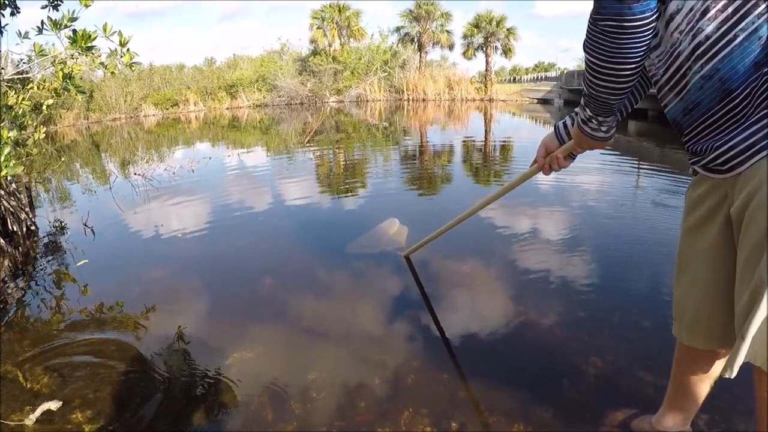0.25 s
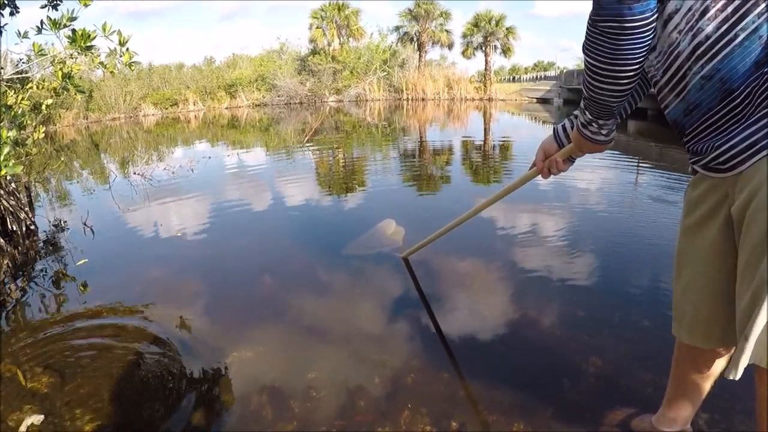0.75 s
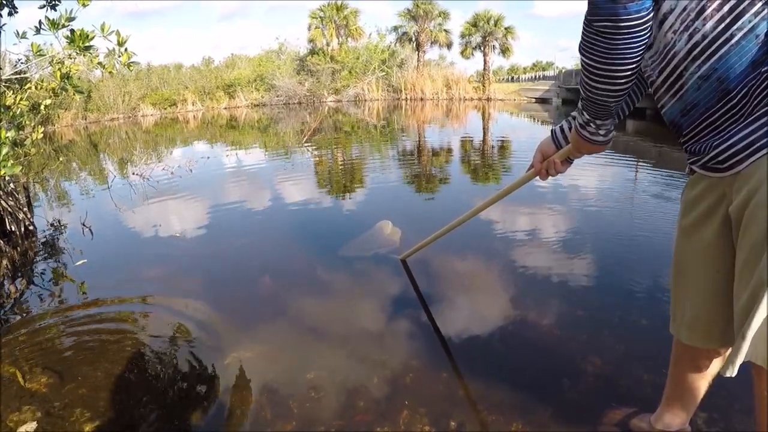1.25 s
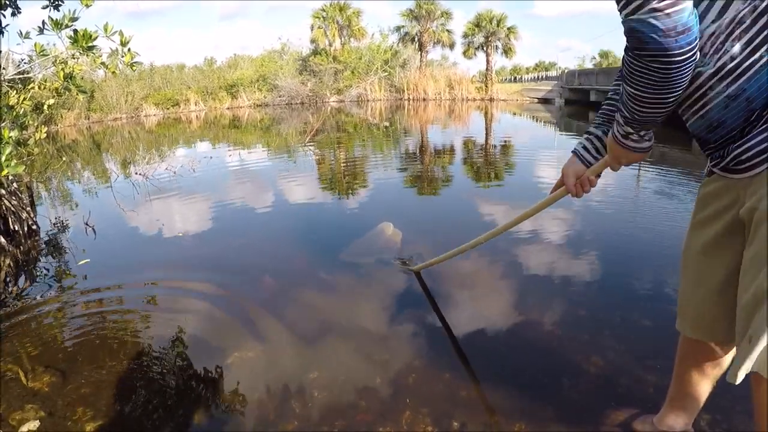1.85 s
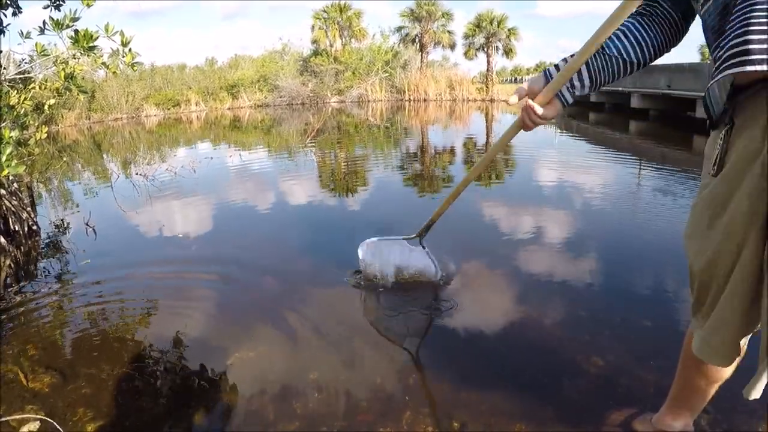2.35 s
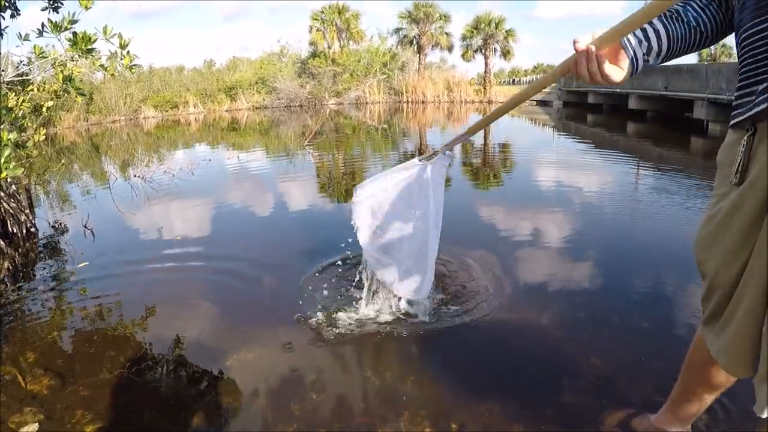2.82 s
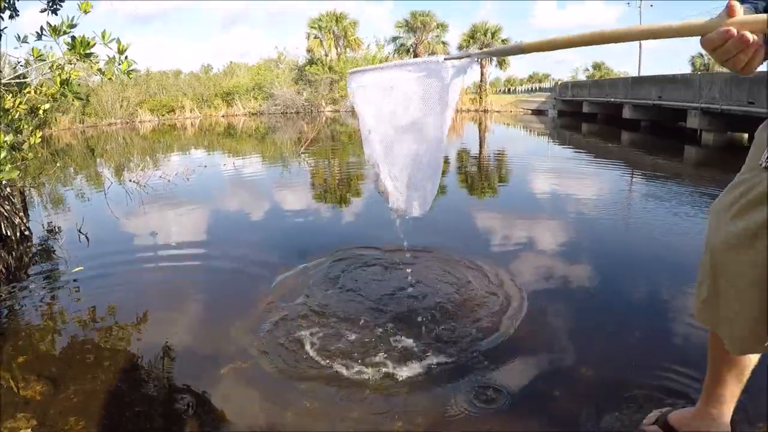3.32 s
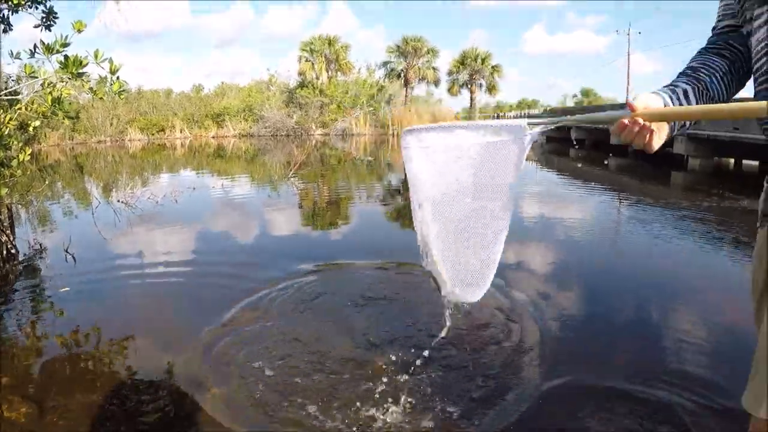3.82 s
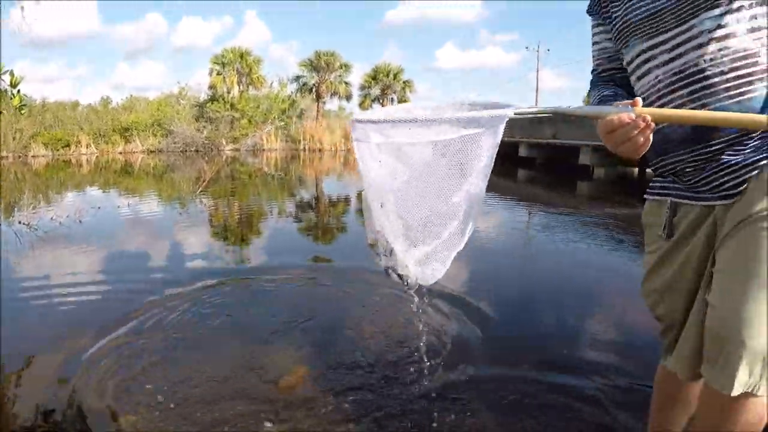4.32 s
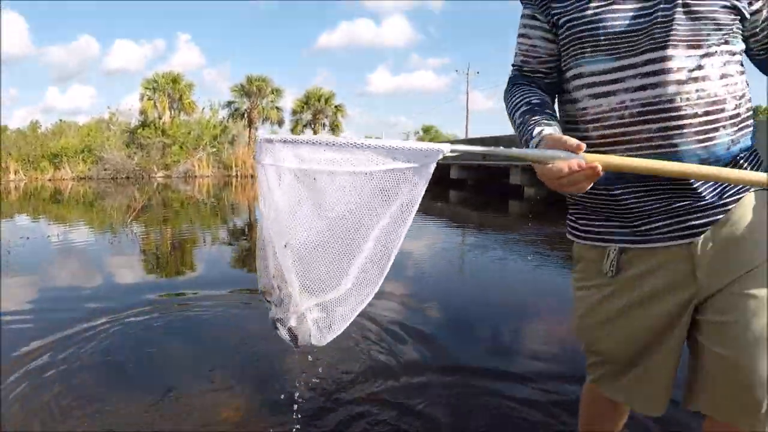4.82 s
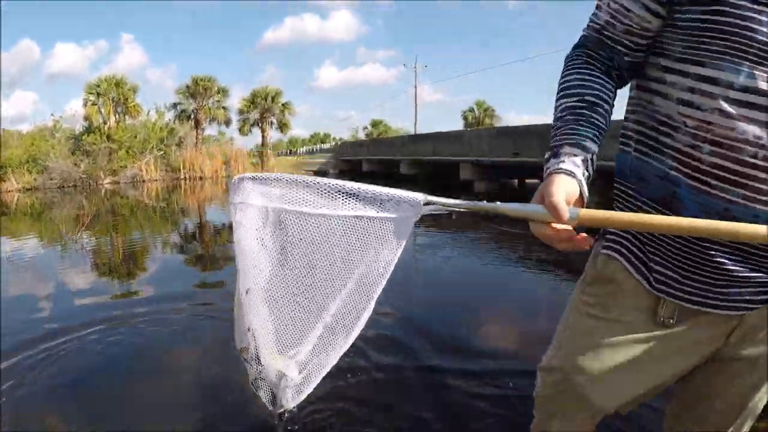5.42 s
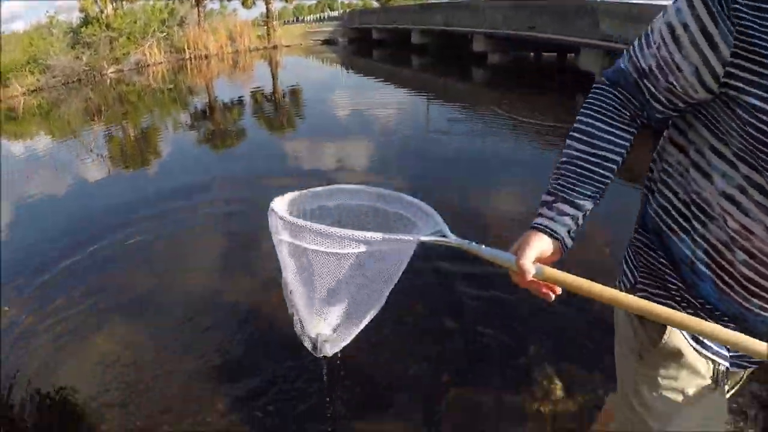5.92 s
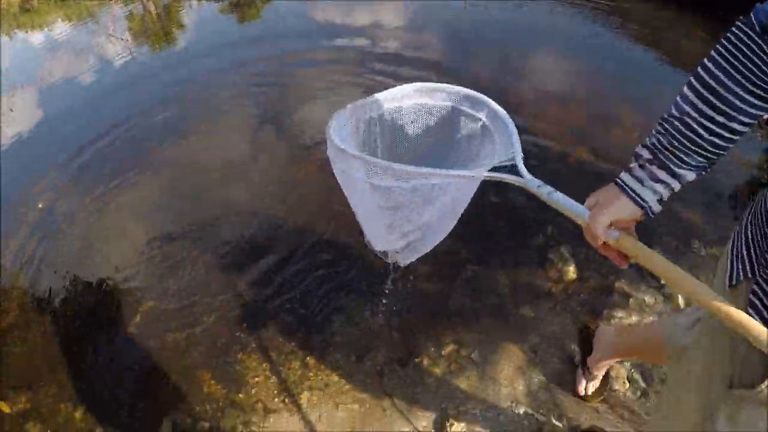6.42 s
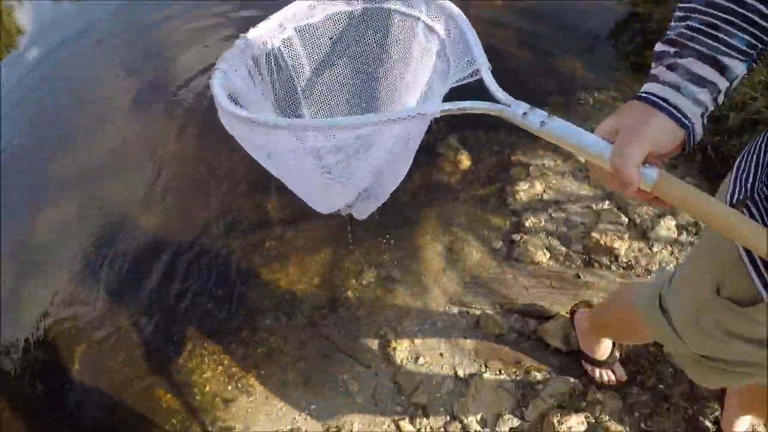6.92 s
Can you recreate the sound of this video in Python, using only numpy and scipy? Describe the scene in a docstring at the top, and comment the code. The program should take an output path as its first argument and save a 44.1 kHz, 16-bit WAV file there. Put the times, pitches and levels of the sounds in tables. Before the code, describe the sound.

Close outdoors at a pond's edge, soft open-air hush and a faint wavering motor hum. After about two seconds a wooden pole knocks lightly, mesh hisses up through the surface, and water gushes from the bag in a bubbly splash. The pour thins into surging trickles, sharp drips and gurgling plops, while wind thumps the microphone, finally roaring mostly on the right.

```python
"""At a pond's edge, close by, a dip net on a wooden pole is lifted out in front of a two-port microphone.
The pole rings a few damped modes as it knocks; the mesh hisses through the surface as swells of noise.
Water pours from the bag as showers of tiny ringing bubbles, thinning amid single drops and gliding bubbles.
Wind noise buffets the microphone, in the end much harder and mostly on the right; a motor hums far away
as one wavering line, under a steady hush of filtered noise from reeds and open air."""
import sys
import numpy as np
from scipy import signal
from scipy.fft import rfft, irfft, next_fast_len
from scipy.io import wavfile
from scipy.ndimage import uniform_filter1d

SR = 44100
rng = np.random.default_rng(int(sys.argv[2]) if len(sys.argv) > 2 else 0)


def dump(signal):
    """Clip the signal to [-1, 1] and save it as 16-bit WAV at the path in sys.argv[1]."""
    limited = np.clip(np.atleast_2d(signal).T, -1, 1)
    pcm = np.round(limited * 32767).astype(np.int16)
    wavfile.write(sys.argv[1], SR, pcm)


N = 315756
TIME = np.arange(N) / SR


def from_db(db):
    """Decibels to gain."""
    return 10 ** (np.asarray(db) / 20)


def rms_one(x):
    """Scale to rms 1."""
    return x / np.sqrt(np.mean(x ** 2) + 1e-20)


def in_time(rows):
    """Each column of a curve at every sample."""
    s, *columns = np.transpose(rows)
    return [np.interp(TIME, s, column) for column in columns]


def drift(per_s):
    """Slow chance with an rms of 1, drawn afresh per_s times a second and joined by lines."""
    return rms_one(np.interp(TIME * per_s, np.arange(N // 100), rng.standard_normal(N // 100)))


def panned(x, pan_db):
    """Place a sound between the ports by left minus right level."""
    gains = from_db(np.array([[pan_db], [-pan_db]]) / 2)
    return x * gains / gains.mean()


def add(out, s, sound):
    """Mix a sound in at time s."""
    i = int(np.clip(s * SR, 0, N - 1))
    out[..., i:i + sound.shape[-1]] += sound[..., :N - i]


def coloured(x, spectrum):
    """Filter x by (f/Hz, level/dB) points, falling 24 dB per octave beyond the end points."""
    hz, db = np.transpose(spectrum)
    size = next_fast_len(N)
    octave = np.log2(np.arange(size // 2 + 1) * SR / size + 1)
    points = np.log2(hz)
    beyond = np.abs(octave - np.clip(octave, points[0], points[-1]))
    gain = from_db(np.interp(octave, points, db) - 24 * beyond)
    return irfft(rfft(x, size) * gain, size)[..., :N]


def band(x, low_hz, high_hz):
    """Butterworth band-pass."""
    edges = [low_hz, min(high_hz, .45 * SR)]
    return signal.sosfilt(signal.butter(3, edges, "band", fs=SR, output="sos"), x)


def evened(x, seconds):
    """Hold the running rms near 1, leaving faster detail."""
    power = np.mean(np.atleast_2d(x) ** 2, axis=0)
    size = max(int(seconds * SR), 2)
    smooth = uniform_filter1d(uniform_filter1d(power, size), size)
    return x / np.sqrt(np.abs(smooth) + 1e-3 * power.mean())


def ring(clicks, hz, t60):
    """A two-pole resonator: a unit click sets a decaying sine of height about 1 ringing."""
    r = from_db(-60 / (t60 * SR))
    w = 2 * np.pi * min(hz, .45 * SR) / SR
    return signal.lfilter([0, np.sin(w)], [1, -2 * r * np.cos(w), r * r], clicks + 1e-18)


PORT_LAG_S = .00006   # longest delay between the microphone's two ports


def grains(per_s, low_hz, high_hz, cycles, spread_db, rise, tilt):
    """Droplets land at random; each traps a tiny bubble with its own size, place and rising pitch."""
    at = np.flatnonzero(rng.random(N) < per_s / SR)
    pitch, size, damping, place, sign = rng.random((5, N))[:, at]
    hz = low_hz * (high_hz / low_hz) ** pitch
    height = from_db(-spread_db * np.log(size + .025)) * np.sign(sign - .5)
    height = height * (hz / low_hz) ** tilt   # small bubbles ring briefly but start sharply
    t60 = cycles * 2 ** (2 * damping - 1) / hz
    t = np.arange(int(t60.max() * SR))[:, None] / SR
    fade = height * from_db(-60 * t / t60)
    phase = 2 * np.pi * hz * t * (1 + rise * t / t60 / 2)
    sound = fade * np.sin(phase)
    where = at + np.arange(len(t))[:, None]
    ports = []
    for near in (place, 1 - place):
        # the port farther from a droplet hears it later and weaker
        lag = ((1 - near) * PORT_LAG_S * SR).astype(int)
        ports.append(np.bincount((where + lag).ravel(), (sound * (near + .5)).ravel(), N)[:N])
    return evened(np.array(ports), 0.76)


LIFT_S = 2.3   # the hoop breaks the surface
DROPLETS_PER_S, THINNING_S = 4600, 3.0   # base rate at first, and its decay time constant
SLOSH_DB, PATTER_DB, SPRAY_DB = -4, -0.5, 0.5   # relative to the flow
CLUMP_DB = 1.44   # rms swing in level as the water lands in uneven clumps
# water draining from the net in surges: t/s, flow level/dB
DRAINING_FLOW = [(2.3, -56), (2.8, -48), (3.15, -46), (3.42, -49), (3.78, -45), (4.15, -47), (4.32, -51.5),
                 (4.72, -51.5), (4.87, -45), (5.04, -57), (5.2, -47), (6.35, -52), (6.6, -74), (7.0, -55)]


def pour():
    """Water falls in clumps, ever sparser: low slosh, middle patter and bright spray follow the flow."""
    flow_db, = in_time(DRAINING_FLOW)
    age = np.maximum(TIME - LIFT_S, 0)
    per_s = DROPLETS_PER_S * np.exp(-age / THINNING_S) * from_db(4.6 * drift(50)) * (age > 0)
    slosh = grains(.3 * per_s, 507, 1834, cycles=17, spread_db=3.5, rise=0.36, tilt=0.92)
    patter = grains(0.9 * per_s, 1784, 4680, cycles=20, spread_db=6.0, rise=0.44, tilt=0.9)
    spray = grains(2.3 * per_s, 4920, 15800, cycles=33, spread_db=6.0, rise=0.089, tilt=0.75)
    water = panned(from_db(SLOSH_DB) * slosh, -11.0)
    water = water + panned(from_db(PATTER_DB) * patter, -3.0)
    water = water + panned(from_db(SPRAY_DB) * spray, -.3)
    return from_db(flow_db + CLUMP_DB * drift(60)) * water


WASH_S, WASH_HALF_S, WASH_DB = 2.79, 0.43, -45   # the full bag empties at once: middle, half length, level


def wash():
    """A sheet of water falls from the full bag and churns the pond into a dense mass of bubbles."""
    swell = np.exp(-((TIME - WASH_S) / WASH_HALF_S) ** 2)
    churn = grains(2000 * (swell > 1 / 10), 800, 4240, cycles=16, spread_db=6.0, rise=0.43, tilt=0.42)
    return panned(from_db(WASH_DB) * swell * churn, -1.1)


# rushes and gurgles of water, first through the rising mesh:
# middle t/s, half length/s, level/dB, low f/Hz, high f/Hz
WATER_RUSHES = [(2.151, 0.22, -50, 1500, 6160), (2.204, 0.048, -42.5, 3680, 8440),
                (2.279, 0.033, -45.5, 5450, 9050), (2.485, 0.067, -45.5, 700, 2200),
                (3.335, 0.056, -39.5, 292, 930), (4.904, 0.012, -31.5, 600, 4220),
                (5.678, 0.21, -52.5, 3000, 8500), (6.156, 0.015, -35.5, 397, 1300),
                (6.441, 0.013, -36, 2280, 4270), (7.04, 0.018, -40.5, 600, 4480)]


def swishes():
    """A sheet of water tears: a swell of rough hiss."""
    out = np.zeros((2, N))
    for s, half_s, db, low_hz, high_hz in WATER_RUSHES:
        t = np.linspace(-2, 2, int(4 * half_s * SR))   # in half lengths
        hiss = rms_one(band(rng.standard_normal((2, SR)), low_hz, high_hz))[:, :len(t)]
        add(out, s - 2 * half_s, from_db(db) * hiss * np.exp(-t ** 2))
    return panned(out * from_db(2.6 * drift(250)), -2.0)


SPATTER_LOW_HZ = 450   # low edge of a drop's spatter
CENTRED_HZ = 6700   # rings this high reach both ports alike; lower ones lean right
# big drops hitting the pond; short rings click, long ones plink:
# t/s, relative level/dB, ring f/Hz, ring length/s
BIG_DROPS = [(2.878, -26.5, 4500, 0.0019), (3.432, -28.5, 6260, 0.0033), (3.455, -30, 2940, 0.009),
             (3.558, -30, 5540, 0.0046), (3.762, -23.5, 3800, 0.0055), (3.776, -28.5, 6250, 0.0033),
             (3.881, -26, 5650, 0.0036), (4.0543, -25.5, 1720, 0.012), (4.081, -26, 2150, 0.0069),
             (4.121, -28, 1700, 0.0039), (4.1684, -24.5, 3460, .005), (4.181, -22.5, 2740, 0.0026),
             (4.404, -19.5, 3300, 0.0042), (4.433, -25.5, 2640, .003), (4.51, -24.5, 2800, 0.015),
             (4.545, -25, 4200, 0.0017), (4.603, -22, 3050, 0.0019), (4.749, -25, 5400, 0.0028),
             (4.854, -27, 3800, 0.0026), (5.265, -32, 1240, 0.012), (5.312, -21, 1690, 0.0031),
             (5.439, -23, 4250, 0.0017), (5.933, -26, 6330, 0.00093), (5.968, -24.5, 5300, 0.0017),
             (6.044, -28.5, 4600, 0.0026), (6.062, -28, 1490, 0.005), (6.083, -26, 4940, 0.0068),
             (6.162, -20.5, 990, 0.011), (6.1736, -22, 3160, 0.0045), (6.217, -26.5, 2920, .006),
             (6.249, -21, 3070, 0.006), (6.2839, -26.5, 1650, 0.0067), (6.301, -21, 1200, 0.0068),
             (6.317, -27.5, 1240, 0.011), (6.3244, -27.5, 5970, 0.0018), (6.345, -27.5, 1830, .005),
             (6.4476, -20, 2770, 0.01), (6.99, -35.5, 6330, 0.0085), (7.059, -22, 950, 0.0078),
             (7.0776, -29, 2300, 0.0053)]
# the lean grows as the net swings close: t/s, left minus right level/dB per octave below CENTRED_HZ
DROP_LEAN = [(5.3, -4), (6.1, -12)]


def drops(swell_share, rise, tick_db, tick_width, spatter_db, spatter_t60):
    """A drop ticks, spatters and traps a bubble whose short ring swells and rises; high ones tick brighter."""
    out, t = np.zeros((2, N)), np.arange(SR // 10) / SR
    for s, db, hz, ring_t60 in BIG_DROPS:
        swell = 1 - np.exp(-t / (swell_share * ring_t60))
        tick = band(1. * (t == 0), 500, tick_width * hz)
        spatter = rms_one(band(rng.standard_normal((2, len(t))), SPATTER_LOW_HZ, 1.67 * hz))
        spatter = spatter * from_db(spatter_db - 60 * t / spatter_t60)
        phase = 2 * np.pi * hz * t * (1 + rise * t / ring_t60 / 2)
        plink = np.sin(phase) * from_db(-60 * t / ring_t60)
        sound = swell * (plink + spatter) + from_db(tick_db) * tick / tick.max()
        lean_db = np.interp(s, *np.transpose(DROP_LEAN)) * np.log2(CENTRED_HZ / hz)
        add(out, s, panned(from_db(db) * sound, lean_db))
    return out


SMALL_BUBBLES_DB = 2   # the weakest stray bubbles, over the flow
SMALL_RISE_OCTAVES, SMALL_LIFE_CYCLES = 0.34, 27.3   # widest glide, and life


def stray_bubbles(count):
    """Rows like those of TRAPPED_AIR for the bubbles that falling water drags under at random."""
    when, pitch, size, glide = rng.random((count, 4)).T
    s = LIFT_S + 3.6 * when ** 1.3
    hz = 850 * 2 ** (2 * pitch)
    db = np.interp(s, *np.transpose(DRAINING_FLOW)) + SMALL_BUBBLES_DB + 7 * size
    return list(zip(s, db, hz, hz * 2 ** (SMALL_RISE_OCTAVES * glide), SMALL_LIFE_CYCLES / hz))


# trapped air: t/s, starting level/dB, start f/Hz, end f/Hz, life/s
TRAPPED_AIR = [(2.348, -32.5, 990, 980, 0.043), (2.433, -36, 875, 1000, 0.025),
               (2.44, -35, 1300, 1350, 0.022), (2.478, -33, 1040, 1000, 0.021),
               (2.498, -35, 885, 1040, .022), (2.738, -43, 483, 720, 0.037),
               (2.994, -32.5, 960, 1000, .018), (3.047, -23, 815, 780, 0.032), (3.15, -34, 743, 700, 0.025),
               (3.269, -32, 270, 294, 0.05), (3.374, -44.5, 838, 1910, 0.045),
               (3.724, -34.5, 556, 1200, 0.022), (3.791, -35, 488, 650, 0.041),
               (3.865, -44.5, 823, 1700, 0.051), (4.566, -39.5, 920, 1540, 0.018),
               (4.798, -18, 510, 476, 0.0031), (4.894, -29.5, 668, 850, 0.027),
               (4.898, -31.5, 1040, 1210, 0.02), (5.0, -42, 605, 1500, 0.05),
               (5.239, -33.5, 1520, 1400, 0.03), (5.315, -27.5, 1280, 1500, 0.01),
               (5.386, -34.5, 880, 840, 0.022), (5.477, -37, 780, 1020, 0.028),
               (5.501, -33.5, 1464, 1410, 0.043), (5.603, -38, 960, 1080, 0.032),
               (5.6552, -19.5, 396, 388, 0.035), (5.75, -41, 582, 1260, 0.031),
               (6.55, -43, 1000, 1400, 0.0286), (6.603, -41, 1270, 1700, 0.029),
               (7.036, -33, 832, 1090, 0.024)]


def bubbles(waver, fade_db, flutter_db):
    """A bubble at rest rings and dies; one nearing the surface glides upward, wavering in pitch and level."""
    out = np.zeros(N)
    for s, db, start_hz, end_hz, life in TRAPPED_AIR + stray_bubbles(count=55):
        age = np.linspace(0, 1, int(life * SR))
        steps = age * life * start_hz / 2   # a fresh chance value every two cycles
        wobble, flutter = (np.interp(steps, np.arange(SR // 100), rng.standard_normal(SR // 100))
                           for part in ("pitch", "level"))
        hz = start_hz * (end_hz / start_hz) ** (age ** 2) * (1 + waver * wobble)
        fade = fade_db * (start_hz / end_hz) ** 4.8 * age   # rising bubbles fade less
        level = from_db(db - fade + flutter_db * flutter * np.sqrt(age))
        ending = np.minimum((1 - age) * 10, 1)
        add(out, s, level * ending * np.sin(2 * np.pi * np.cumsum(hz) / SR))
    return panned(out, -5.5)


# the pole knocks in the hands: t/s, relative level/dB
POLE_KNOCKS = [(1.87, -26), (1.929, -25.5), (1.973, -20.5), (2.045, -32.5)]
# modes of the wooden pole: f/Hz, level/dB
POLE_MODES = [(450, 2.5), (980, -4), (1529, 12), (2050, 7.5), (2724, 2), (3208, -4)]


def pole(tap, chatter, chatter_s, t60):
    """Each knock rattles a few times in quick succession and rings the hand-damped modes of the pole."""
    contact, t = np.zeros(N), np.arange(SR // 20) / SR
    for s, db in POLE_KNOCKS:
        rattle = rng.standard_normal(len(t)) * np.exp(-(t / chatter_s) ** 2)
        rattle = rattle / np.linalg.norm(rattle)
        add(contact, s, from_db(db - 13.5) * (tap * (t == 0) + chatter * rattle))
    modes = sum(from_db(db) * ring(contact, hz, t60) for hz, db in POLE_MODES)
    return panned(modes + 2.5 * band(contact, 250, 3800), -7.5)


def bank_echo(x, t60, wet_db):
    """Water, bank and body scatter a brief echo, different at each port."""
    t = np.arange(SR // 5) / SR
    echo = rng.standard_normal((2, len(t))) * from_db(-60 * t / t60) * (t > .001)
    echo /= np.sqrt(np.sum(echo ** 2, axis=1, keepdims=True))
    return x + from_db(wet_db) * signal.fftconvolve(x.mean(axis=0)[None], echo, axes=1)[:, :N]


def port_noise(spectrum, shared):
    """Wind pressure at the two ports; part of each swing reaches the left one a quarter cycle early."""
    own, right = (evened(coloured(rng.standard_normal(N), spectrum), 0.071) for port in "LR")
    early = -signal.hilbert(right, next_fast_len(N)).imag[:N]
    shared = np.clip(shared, 0, 1)
    return np.array([shared * early + np.sqrt(1 - shared ** 2) * own, right])


# single eddies that slap the right port: t/s, relative level/dB, starting f/Hz above the final heave
PORT_EDDIES = [(3.418, -17.5, 169), (5.164, -11.5, 224), (5.987, -9.5, 248), (6.042, -8.5, 200),
               (6.081, -13.5, 182), (6.28, -10, 172), (6.342, -9, 170), (6.415, -8, 210), (6.441, -11, 300),
               (6.476, -8, 210), (6.535, -7, 340), (6.592, -7, 227), (6.634, -9, 348), (6.682, -6.5, 195),
               (6.7119, -6, 450), (6.77, -11, 278)]


def buffets(end_hz, slow_s, t60):
    """An eddy hits with a quick swing of pressure that slows into a heave."""
    out, t = np.zeros(N), np.arange(SR // 6) / SR
    for s, db, extra_hz in PORT_EDDIES:
        hz = end_hz + extra_hz * np.exp(-t / slow_s)
        swing = -np.sin(2 * np.pi * np.cumsum(hz) / SR) * (1 - np.exp(-t / 0.0035))
        add(out, s, from_db(db - 3.5 - 60 * t / t60) * swing)
    return panned(out, -23.0)


SURGE_HALF_S = 0.023
# wind at the microphone: t/s, relative rumble level/dB
WIND_RUMBLE = [(0.1, -33), (0.58, -44.5), (1.25, -35.5), (2.05, -32.5), (2.4, -36), (3.33, -35),
               (3.45, -35.5), (4.0, -25), (4.72, -30), (5.1, -24.5), (6.6, -23.5), (7.0, -25.5)]
# fine turbulence as the gust grows: t/s, level/dB
GUST_TURBULENCE = [(3.3, -73), (4.0, -54.5), (6.3, -41), (6.64, -34.5), (6.73, -28.5), (6.82, -30.5),
                   (6.93, -23.5), (7.16, -27)]
# sudden surges and lulls: middle t/s, change of level/dB
WIND_SURGES = [(3.45, 16), (3.58, 7), (3.68, 6.5), (4.15, 5.5), (4.4, 7.5), (4.87, 5), (4.93, -8),
               (6.385, -9.5)]
# colour of the slow heaving: f/Hz, level/dB
RUMBLE_COLOUR = [(18, 9), (34, 3), (67, -3.5), (130, -17.5), (300, -44.5)]
# colour of the fine turbulence: f/Hz, level/dB
TURBULENCE_COLOUR = [(50, -31), (110, 4), (200, -4), (350, -9), (500, -22.5), (1500, -30)]


def wind():
    """Slow heaving pressure and finer turbulence share lumps, surges and lulls; single eddies slap on top."""
    surge_db = sum(db * np.exp(-((TIME - s) / SURGE_HALF_S) ** 2) for s, db in WIND_SURGES)
    lumps = from_db(surge_db + 1.8 * np.tanh(drift(18)))
    rumble = from_db(in_time(WIND_RUMBLE)[0] + 3.5) * port_noise(RUMBLE_COLOUR, shared=0.68)
    turbulence = from_db(in_time(GUST_TURBULENCE)[0]) * port_noise(TURBULENCE_COLOUR, shared=0.91)
    return panned(lumps * (rumble + turbulence), -9.0) + buffets(end_hz=35.5, slow_s=0.00504, t60=0.2)


# distant motor: t/s, level/dB
MOTOR_HUM = [(0, -40), (.4, -39.5), (.5, -53.5), (.87, -41), (1.15, -43), (1.4, -54.5), (2.75, -46),
             (3.3, -56.5), (4.2, -44)]


def motor(hz, waver_hz, flutter_db):
    """A far motor: one narrow line that wavers in pitch and strength."""
    level_db, = in_time(MOTOR_HUM)
    line = np.sqrt(2) * np.sin(2 * np.pi * np.cumsum(hz + waver_hz * drift(35)) / SR)
    return panned(from_db(level_db + flutter_db * drift(25)) * line, 0.92)


AIR_DB = -42
# colour of the open air: f/Hz, relative level/dB
AIR_COLOUR = [(60, 0.5), (200, -3.5), (340, -9), (520, -16), (1450, -17), (2700, -24.5), (5000, -27.5),
              (14000, -27.5)]


def air(shared):
    """Steady hush of reeds and open air, partly alike on both sides."""
    noise = rng.standard_normal((3, N))
    return panned(rms_one(coloured(noise[:2] + shared * noise[2], AIR_COLOUR)), -1.86)


def scene():
    """Net and water close by, the open air, and wind on the microphone."""
    plinks = drops(swell_share=0.025, rise=0.12, tick_db=-13.5, tick_width=4.1,
                   spatter_db=-10.5, spatter_t60=0.021)
    water = pour() + wash() + swishes() + from_db(4.0) * plinks
    water = water + bubbles(waver=0.051, fade_db=29.0, flutter_db=5.0)
    near = water + pole(tap=0.37, chatter=1.52, chatter_s=0.0096, t60=0.0076)
    heard = bank_echo(near, t60=.05, wet_db=-10.0)
    far = motor(hz=166.3, waver_hz=2.93, flutter_db=1.5) + from_db(AIR_DB) * air(shared=0.56)
    return heard + wind() + far


CUTOFF_HZ = 15200
# colour of the microphone in its housing: f/Hz, level/dB
MICROPHONE_COLOUR = [(15, 2), (5100, 2.5), (5900, 9), (7400, 9), (8300, 0.5), (11000, -8.5), (13000, -13),
                     (15000, -24)]


def record(dry):
    """The housing colours the treble, the loudest peaks are rounded off, and the top is cut steeply."""
    pressure = coloured(dry, MICROPHONE_COLOUR)
    rounded = pressure / (1 + (pressure / .8) ** 4) ** .25
    return signal.sosfilt(signal.ellip(10, .1, 80, CUTOFF_HZ, fs=SR, output="sos"), rounded)


dry = scene()
out = record(dry)
dump(out)
```